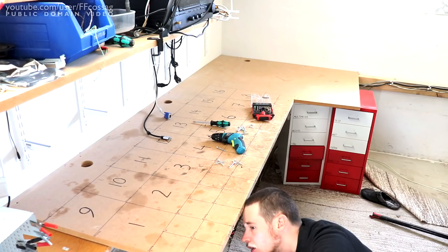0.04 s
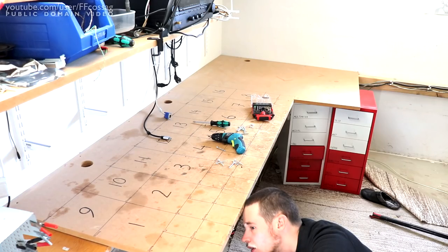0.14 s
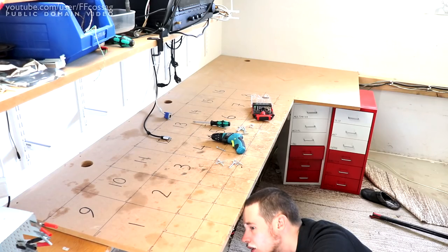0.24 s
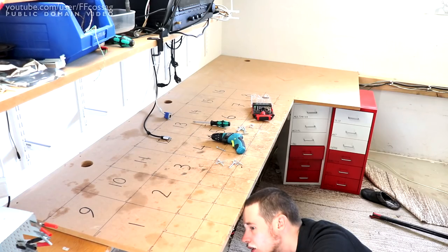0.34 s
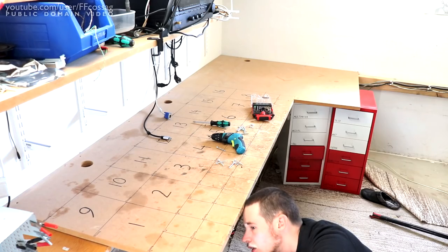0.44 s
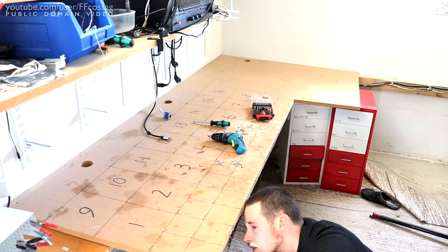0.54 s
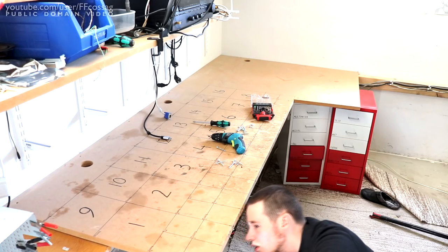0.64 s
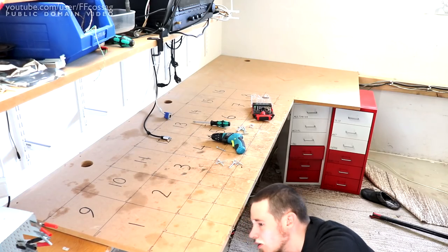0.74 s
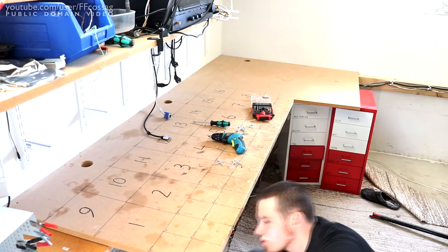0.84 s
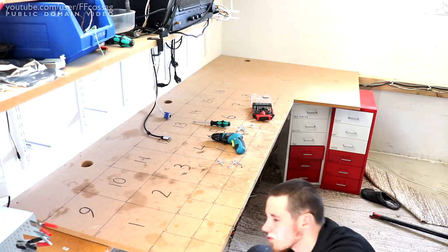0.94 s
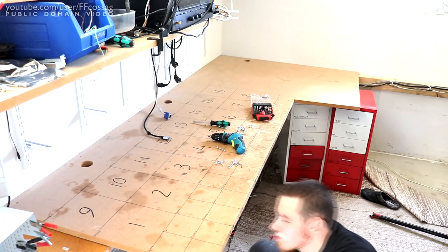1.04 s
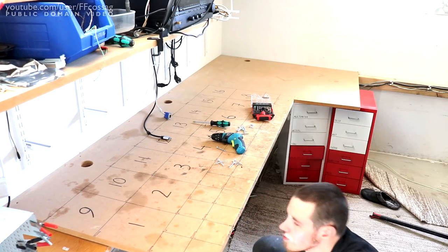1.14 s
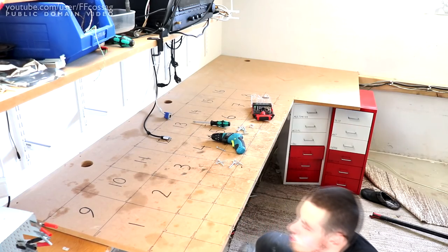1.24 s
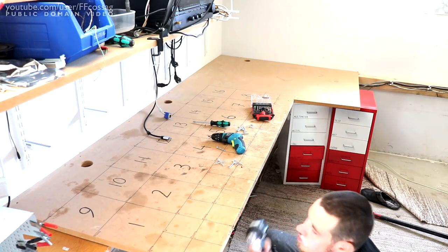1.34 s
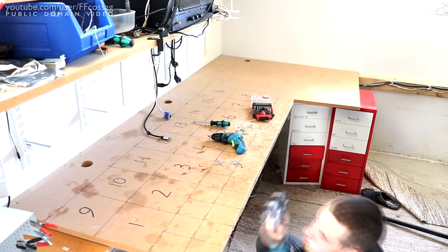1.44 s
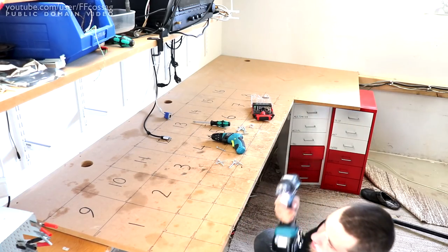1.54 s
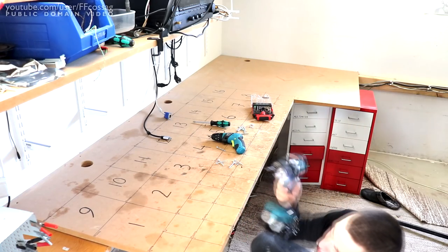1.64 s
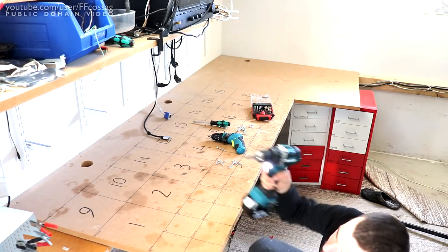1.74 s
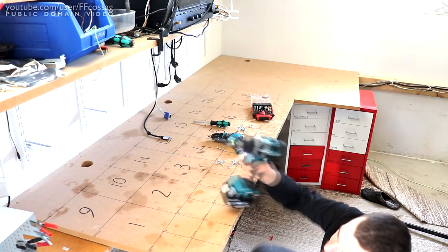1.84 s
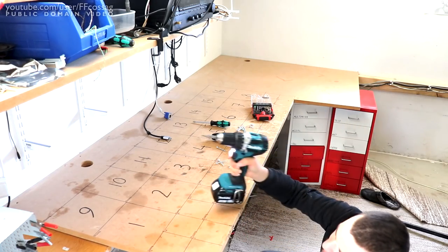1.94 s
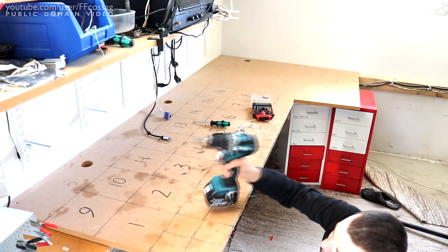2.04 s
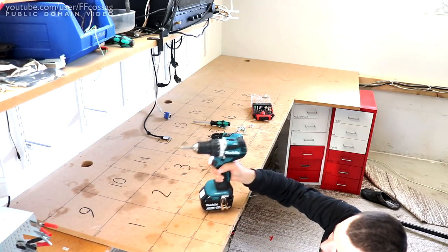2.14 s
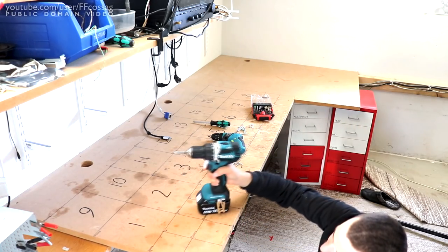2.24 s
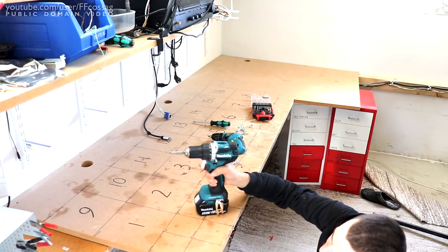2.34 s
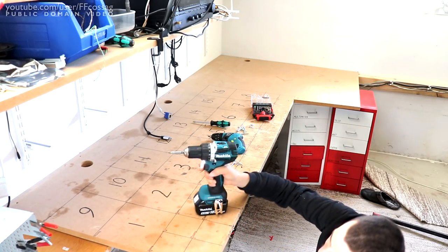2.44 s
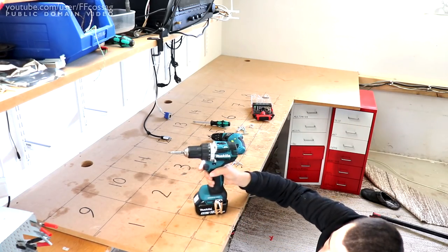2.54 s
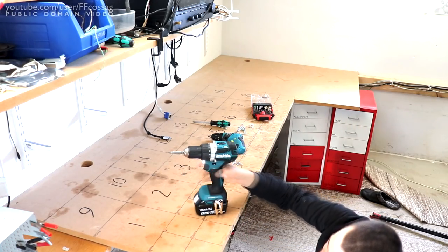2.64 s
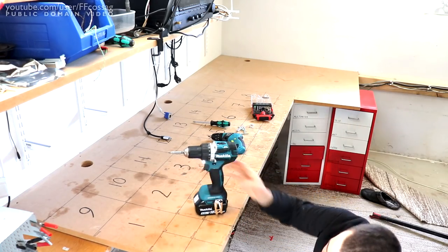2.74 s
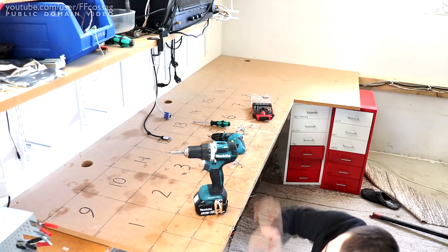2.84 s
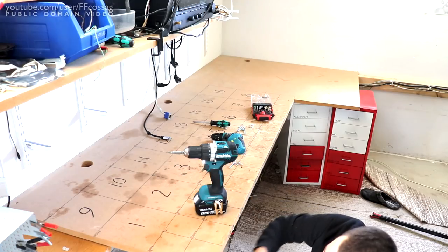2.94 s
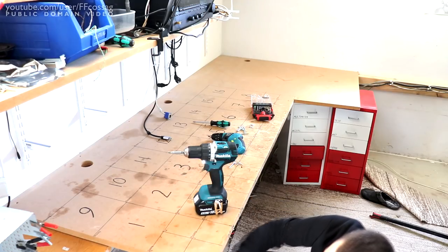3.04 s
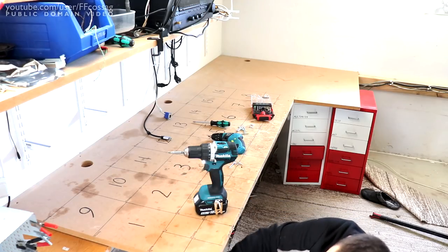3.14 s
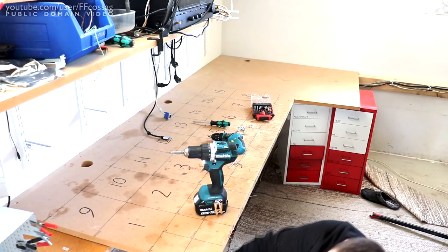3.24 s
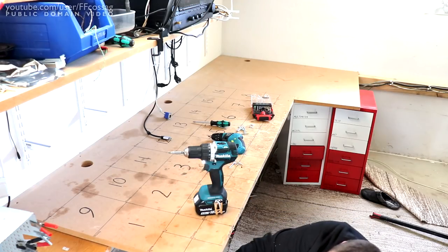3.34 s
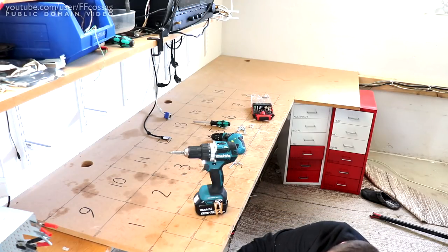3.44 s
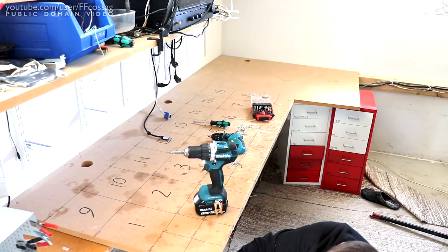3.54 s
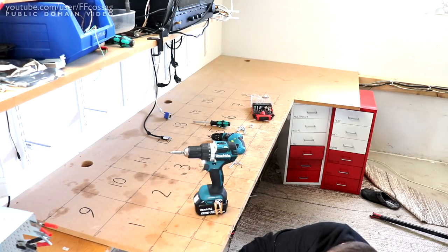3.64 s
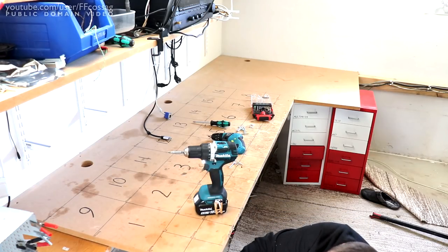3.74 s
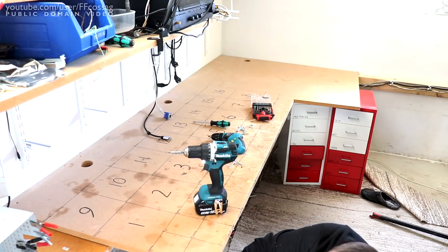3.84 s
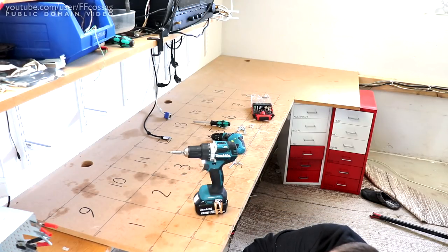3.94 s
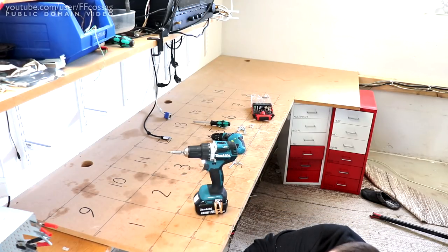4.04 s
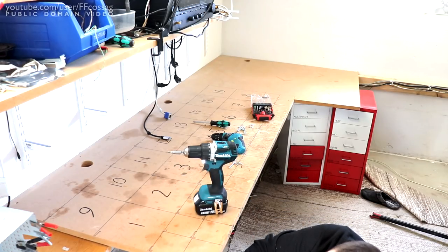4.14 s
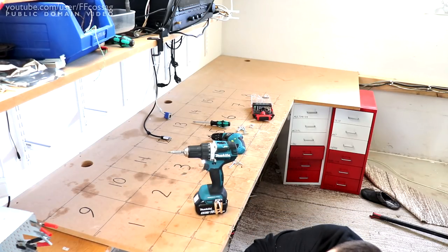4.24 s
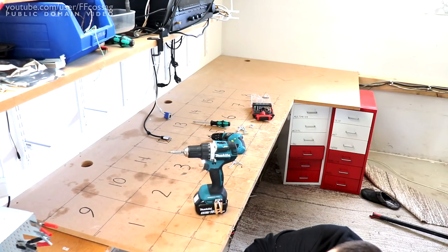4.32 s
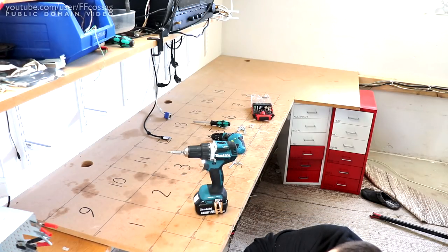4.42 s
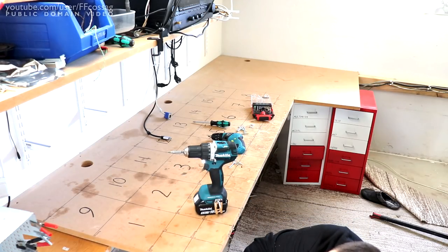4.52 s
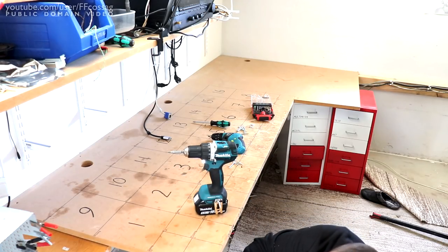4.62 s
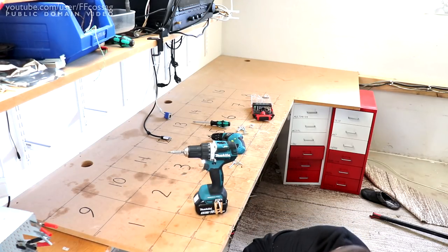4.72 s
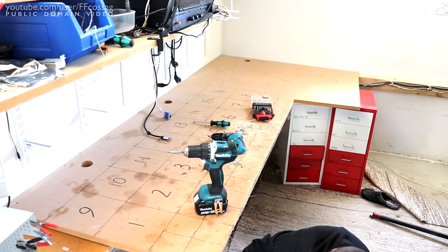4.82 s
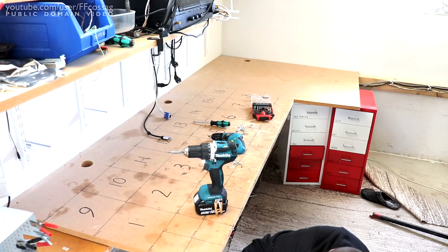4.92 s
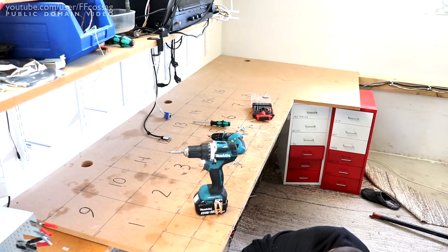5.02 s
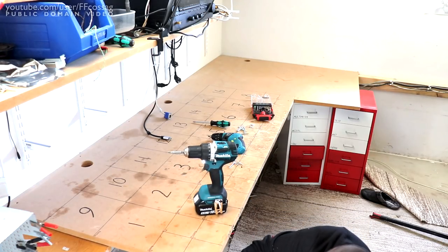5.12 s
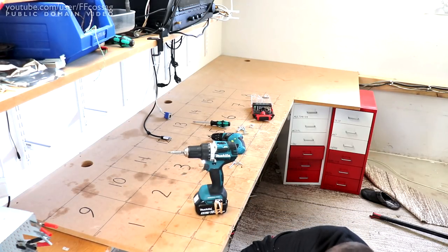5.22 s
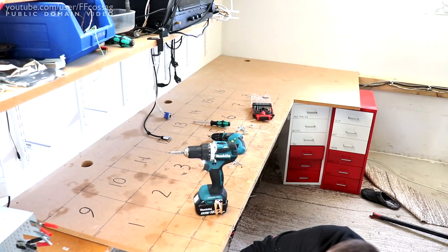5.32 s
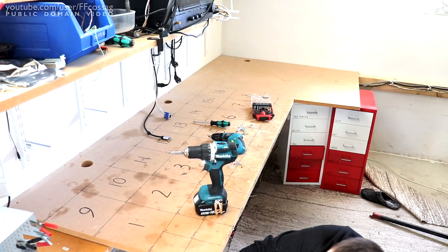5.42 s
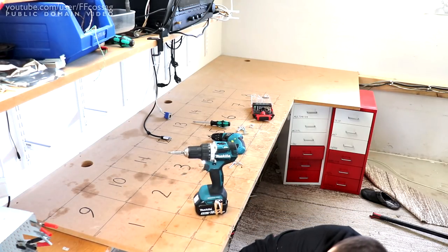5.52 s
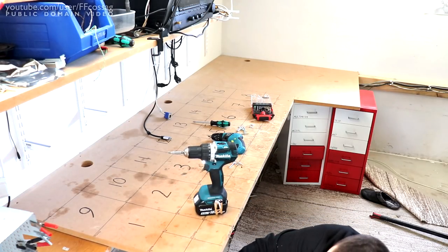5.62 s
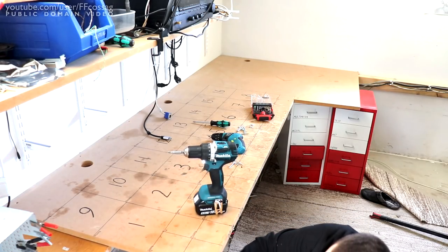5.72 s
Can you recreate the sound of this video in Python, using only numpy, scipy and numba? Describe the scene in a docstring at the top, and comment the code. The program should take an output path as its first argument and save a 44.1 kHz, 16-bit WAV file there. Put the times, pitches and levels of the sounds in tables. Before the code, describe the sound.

A close, fairly dry take in a small workshop with faint room air. At once a cordless drill is running down: grainy gear noise and a thin whine sink in pitch, over soft low bumps, until the gears lock with a sharp double clack at 0.3 s. After a faint metallic stir, a short downward scrape and rough knocks at 0.85-1.0 s, then lighter taps to 1.25 s, as the drill is lifted off the floor. A soft sleeve swish rises around 1.6 s. At 2.33 s comes the loudest event: a hard, cracking thunk on the wooden bench, with quick follow-up clunks to 2.5 s and a low woody ring. From 2.7 s a hand rummages quietly among bits and screws, with tiny clinks near 2.9 s and dull bumps, the strongest at 3.75 s. A faint low hum swells after 4.4 s; the brightest clinks come around 5.45 s.

```python
"""A cordless drill runs down and locks, is dragged and lifted off the floor and set down hard on a wooden bench.
Then a hand rummages among metal bits and screws while soft bumps shake the bench and a low hum swells.
Gear noise and metal pieces are random impacts filtered by resonances; the bench is a sum of decaying modes,
rubbing is moving bands of friction grains, and sparse reflections and filtered noise give the room and its air."""
import sys
import numpy as np
from scipy import signal
from scipy.fft import rfft, irfft
from scipy.io import wavfile
from scipy.ndimage import uniform_filter1d
from numba import njit

SR = 44100
rng = np.random.default_rng(int(sys.argv[2]) if len(sys.argv) > 2 else 0)


def pcm_store(signal):
    """Save signal as 16-bit PCM."""
    levels = np.round(np.clip(np.atleast_2d(signal), -1, 1) * 32767)
    wavfile.write(sys.argv[1], SR, levels.astype(np.int16).T)


N = 254587

# Spectrum of the still room. Each row: frequency in Hz, relative density in dB per Hz.
AIR_SPECTRUM = [(15, -58), (25, -16), (76, -2), (113, -9.5), (200, -5.5), (291, -11), (342, -8.5),
                (637, -13), (691, -12.5), (749, -12.5), (1930, -17), (5230, -21.5), (15800, -29.5)]
# Reverberation of the room. Each row: frequency in Hz, time to fall 60 dB in s.
ROOM_DECAY = [(200, 0.53), (530, 0.33), (1390, 0.23), (3680, 0.3), (9700, 0.27), (15000, 0.23)]
# Swells of the low hum. Each row: time at full level in s, level in dB, rise in s.
HUM_SWELLS = [(4.45, -62, 0.32), (4.65, -61, 0.17), (5.24, -56.5, 0.49)]
# Bench-top modes. Each row: frequency in Hz, level in dB, 60 dB decay time in s for a brief contact,
# build-up time in s before the contact's share, signed weight.
BENCH_MODES = [(83.1, -0.5, 0.77, 0.02, 0.65), (103.1, -2.5, 0.62, 0.061, -0.54),
               (133.9, -1.5, 0.8, 0.0074, 0.32), (162.55, 1, 0.56, 0.042, -0.66),
               (182.6, -6.5, 0.45, 0.023, 0.97), (200.5, -4.5, 0.53, 0.038, 0.73),
               (235, -25, 0.73, 0.016, 0.53), (266.6, -6.5, 0.45, 0.015, 0.74),
               (343, -9, 0.53, 0.023, -1.27), (406, -8, 0.56, 0.011, -0.86), (453, -7, 0.22, .01, 0.68),
               (512, -11.5, 0.22, 0.007, -1.4), (640, -18, 0.25, 0.011, 0.71),
               (900, -7, 0.13, 0.0042, -0.87)]
# The frame's two lowest modes start opposed and beat. Each row: frequency in Hz, 60 dB decay time in s, weight.
FRAME_MODES = [(61.1, 1.2, 1), (65.15, 1.25, -.68)]
# Blows that shake the bench. Each row: start in s, top level in dB, contact time in s, frame sway level in dB.
BUMPS = [(.0, -34.5, 0.0045, -34.5), (0.117, -35.5, 0.0083, -41), (.238, -43.5, 0.0033, -42),
         (.69, -38, 0.0039, -44), (.998, -50, 0.002, -75), (2.332, -15, 0.00055, -15.5),
         (2.405, -28, 0.0028, -30), (3.311, -41, 0.0039, -49.5), (3.758, -25.5, 0.0062, -37.5),
         (4.119, -43.5, .0047, -50), (4.359, -44.5, 0.0079, -60), (4.549, -53.5, 0.0018, -78),
         (5.021, -48, .0056, -64), (5.202, -38, 0.0022, -56), (5.44, -39, 0.0097, -47.5),
         (5.719, -39.5, 0.0085, -69)]
# A drag over the floor with a faint trail after it, a sleeve sweeping up in two moves. Each row: time at full
# level in s, level in dB, rise in s, hold in s, first centre in Hz, last centre in Hz, glide in s.
RUBS = [(0.859, -41, 0.031, 0.15, 1650, 490, .11), (1.201, -64.5, .15, 0.1, 850, 860, .1),
        (1.549, -53, .15, 0.037, 900, 1150, .15), (1.645, -47, .2, 0.018, 1000, 3130, 0.3)]
# Rings of the heavy pieces. Each row: frequency in Hz, width in Hz before broadening, level in dB.
HEAVY_RINGS = [(1245, 17.5, -1), (1376, 31, -4), (1492, 63, 2), (1707, 117, -6.5), (2001, 38.5, 2.5)]
# Rings of the light pieces. Each row: frequency in Hz, width in Hz before broadening, level in dB.
LIGHT_RINGS = [(2270, 50, 3.5), (2650, 220, 2.5), (3250, 104, -6), (3634, 36, -2.5), (3920, 52, -4),
               (4240, 80, -7), (4420, 150, -6), (4625, 78, -5.5), (5080, 59, -5), (5938, 38, -2.5),
               (6140, 180, -8), (6810, 34, -8.5), (7160, 77, -15), (7670, 50, -11.5), (8150, 230, -14.5),
               (8850, 100, -15), (9000, 44, -13.5), (9900, 49, -11), (9420, 82, -19), (10500, 190, -12.5),
               (11300, 92, -16.5), (12600, 33, -19), (13300, 38, -20), (14600, 61, -25)]
# Spectrum of pieces sliding. Each row: frequency in Hz, relative density in dB per Hz.
SLIDE_SPECTRUM = [(150, 1.5), (250, -5), (354, -0.5), (857, -7), (1350, -2), (2000, -10), (2260, -14),
                  (4380, -15), (15800, -57)]
# Strokes of the hand among the bits. Each row: time at full level in s, heavy pieces in dB,
# light pieces in dB, rise in s, hold in s.
STIRS = [(.57, -61.5, -65, .06, 0.025), (0.692, -57.5, -61, 0.076, 0.027), (2.63, -62, -67, .04, .005),
         (2.707, -78, -56, 0.092, .005), (2.795, -56, -58, 0.088, .005), (2.914, -49.5, -50, 0.059, 0.0042),
         (3.317, -41.5, -43, 0.043, 0.013), (3.411, -58, -52.5, 0.046, .005),
         (3.698, -53, -52.5, 0.034, 0.024), (3.812, -44.5, -48, .16, 0.024),
         (4.103, -47.5, -51.5, 0.085, .04), (4.354, -44.5, -50.5, 0.11, .015),
         (4.57, -46.5, -50.5, 0.082, 0.0054), (4.888, -54.5, -59, .05, 0.055),
         (5.047, -47, -53, 0.093, 0.096), (5.201, -39.5, -44, 0.083, 0.0086),
         (5.28, -61.5, -55.5, .06, 0.063), (5.474, -61.5, -41, 0.22, 0.038), (5.78, -53, -44.5, 0.13, .01)]
# Single clinks of light pieces. Each row: start in s, level in dB, decay constant of the drive in s,
# main ring in Hz, relative level of that ring in dB.
CLINKS = [(2.899, -34, 0.0074, 2226, 27), (2.998, -43, 0.003, 5800, 11), (3.014, -42, 0.0042, 5350, 8),
          (3.673, -41.5, 0.041, 4420, 18), (5.164, -34, 0.017, 4370, 19), (5.253, -34.5, 0.027, 2620, 6),
          (5.419, -32, 0.014, 2270, 7), (5.464, -16.5, 0.0037, 2270, 4), (5.495, -20.5, 0.0057, 2270, 4),
          (5.705, -42.5, 0.026, 11100, 4), (5.74, -41, .008, 2270, -5)]
# Hard contacts. Each row: start in s, level in dB, brightness in dB per octave, rise constant in s,
# chatter decay constant in s, high-pass corner in Hz.
KNOCKS = [(0.314, -14, -0.5, 0.0007, 0.0042, 2200), (0.334, -14.5, 2, .0015, 0.012, 696),
          (0.841, -22, -1.5, 0.0051, .017, 570), (.911, -27, -2.5, 0.0012, 0.011, 340),
          (0.961, -26.5, -4, 0.005, 0.028, 596), (1.139, -39.5, -1.5, 0.0026, 0.013, 300),
          (1.244, -41, -15.5, .0015, 0.0096, 304), (2.3314, -2.5, -2.5, 0.00056, 0.0058, 200),
          (2.343, -6.5, -5.5, 0.0019, 0.014, 250), (2.36, -5, -8, 0.0022, 0.013, 249),
          (2.406, -9, -6.5, 0.006, 0.015, 250), (2.466, -12, -13.5, 0.0037, .02, 198),
          (2.71, -46, 11, .004, 0.015, 505), (3.295, -42, -26, .002, .025, 300),
          (5.2, -50, -15, .01, .019, 200)]
# Spectrum of a hard contact before its brightness. Each row: frequency in Hz, relative density in dB per Hz.
CONTACT_SPECTRUM = [(88, -13), (150, -8.5), (566, -3), (871, -6.5), (1390, -2), (1830, -5), (2020, -4.5),
                    (2700, -6.5), (2920, -8.5), (9260, -19), (16000, -36)]
# Gear rate running down. Each row: time in s, rate in Hz.
GEAR_RATE = [(0, 665), (.07, 640), (.18, 563), (.26, 532), (.3, 500), (.345, 441)]
# Meshing noise. Each row: frequency in Hz, relative density in dB per Hz.
MESH_SPECTRUM = [(120, -16), (200, -14.5), (340, -6), (366, -9.5), (863, -21.5), (1100, -12.5),
                 (1200, -9.5), (2190, -10), (2400, -9), (4160, -4), (5180, 2), (13900, -32), (15800, -31)]
# Resonances of the drill's shell. Each row: frequency in Hz, width of each of two poles in Hz, level in dB.
SHELL_MODES = [(2150, 98, -2), (2850, 28, -14), (3200, 44, -17), (3430, 260, -4), (4580, 24, -18),
               (5070, 150, 2), (5400, 110, -13), (5900, 63, -9), (5830, 29, 2), (6630, 170, 5),
               (7170, 95, 1), (8700, 73, -3)]
# Tones tied to the gear rate. Each row: multiple of the rate, relative level in dB.
GEAR_TONES = [(.5, 0), (2, -7), (3, -4), (4, -2)]
# Tone of the speed controller: starting frequency in Hz, starting level in dB.
CONTROLLER_TONE = (15420, -57)

# Source levels are in dB before the mix in scene().
AIR_DB = -60.5
HUM_HZ, HUM_HOLD_S, HUM_FALL_DB_PER_S = 185.5, 0.012, 113
RISE_DB = 25  # growth of any stroke during its rise
DEEP_DB, PLAIN_CONTACT_S = 2, .0018  # the lowest top mode gains this much each time the contact doubles
RUB_FALL_DB_PER_S = 254
STIR_FALL_DB_PER_S, LIGHT_LEAD_S = 291, 0.011  # the light pieces move first
GEAR_DB, GEAR_SAG_DB_PER_S = -26, 14
LOCK_S, LOCK_DB_PER_S = .33, 2000  # the gears stop
WHINE_DB, WHINE_SWELL_DB_PER_S, WHINE_FULL_S = -41.5, 64, 0.15  # the tones come up as the speed falls
GROWL_DB, GROWL_FADE_DB_PER_S = -41.5, 65  # the half-rate tone instead dies away from the start
BAND_LIMIT_HZ = 15750


def amp(db):
    """Level definition: the amplitude gain of a level in dB."""
    return 10 ** (np.asarray(db) / 20)


def even(x):
    """Power normalization: scales to rms 1."""
    return x / np.sqrt(np.mean(x ** 2) + 1e-20)


def steady(x, span_s):
    """Short-time power normalization: evens the slow level of a random sound."""
    power = abs(uniform_filter1d(x ** 2, round(span_s * SR)))
    return x / np.sqrt(power + 1e-20)


def read(points, hz):
    """Interpolation of a table on a logarithmic frequency axis."""
    f, value = np.transpose(points)
    return np.interp(np.log(hz + 1), np.log(f + 1), value)


def add(mix, s, sound):
    """Superposition: adds a sound to the mix at time s."""
    part = mix[round(s * SR):][:len(sound)]
    part += sound[:len(part)]


def colour(x, points, tilt_db=0.):
    """Spectral shaping by a table, tilted in dB per octave about roughly 1 kHz."""
    hz = np.fft.rfftfreq(len(x), 1 / SR)
    tilt = tilt_db * np.log2((hz + 100) / 1000)
    return irfft(rfft(x) * amp(read(points, hz) + tilt), len(x))


@njit
def smooth(x, r):
    """First-order low-pass filtering with a pole that may change."""
    out, y = np.empty_like(x), 0j
    for i in range(len(x)):
        y = r[i] * y + (1 - r[i]) * x[i]
        out[i] = y
    return out


def resonate(x, hz, width):
    """Heterodyne resonance: shifts a moving centre to zero, smooths, and shifts it back."""
    turn = np.exp(2j * np.pi * np.cumsum(hz) / SR)
    r = np.exp(-np.pi * width / SR)
    return 2 * (turn * smooth(x / turn, r)).real


def twice(x, hz, width):
    """Second-order resonance: one fixed complex pole applied two times for steep skirts."""
    r = np.exp(-np.pi * width / SR)
    pole = r * np.exp(2j * np.pi * hz / SR)
    return 2 * signal.lfilter([(1 - r) ** 2], [1, -2 * pole, pole ** 2], x + 0j).real


def taps(count, per_s, spread_db):
    """Impulsive excitation: a random train of small impacts, a few much larger."""
    u, size = rng.random(count), rng.exponential(1, count)
    sign = rng.choice([-1., 1.], count)
    return sign * amp(spread_db * np.minimum(size, 4)) * (u < per_s / SR)


def swell(t, s, rise, hold, fall_db):
    """Exponential envelope in dB: rise, hold from time s, then a steady fall per second."""
    growth = -RISE_DB * np.maximum(s - t, 0) / rise
    return growth - fall_db * np.maximum(t - s - hold, 0)


def still_air():
    """Stationary noise: Gaussian noise shaped to the spectrum of the still room."""
    return amp(AIR_DB) * even(colour(rng.standard_normal(N), AIR_SPECTRUM))


def hum():
    """Narrow-band noise: a resonance makes a low tone that comes and goes."""
    t = np.arange(N) / SR
    level = sum(amp(db + swell(t, s, rise, HUM_HOLD_S, HUM_FALL_DB_PER_S)) for s, db, rise in HUM_SWELLS)
    return level * steady(twice(rng.standard_normal(N), HUM_HZ, 11.0), 0.088)


def room(x):
    """Reverberation: sparse reflections of random sign, each band dying at its own speed."""
    tail = np.zeros(SR)
    at = np.arange(200, SR - 20, 20)
    tail[at + rng.integers(0, 20, len(at))] = rng.choice([-1., 1.], len(at))
    hz, t, bands = signal.stft(tail, SR, nperseg=256)
    decay = amp(-60 * t / read(ROOM_DECAY, hz)[:, None])
    tail = signal.istft(bands * decay, SR, nperseg=256)[1]
    return signal.fftconvolve(x, tail / np.linalg.norm(tail))[:N]


def bump(db, contact, sway_db):
    """Modal excitation: a longer contact excites only the low modes, and each spot favours others."""
    t, top = np.arange(SR + SR // 2) / SR, 0
    spot_db = 0.57 * rng.standard_normal(len(BENCH_MODES))
    spot_db[0] = DEEP_DB * np.log2(contact / PLAIN_CONTACT_S)
    for k, (hz, mode_db, t60, rise, sign) in enumerate(BENCH_MODES):
        soft = 1 / (1 + (hz * contact) ** 4)
        grow = 1 - np.exp(-t / (rise + 0.88 * contact))  # a soft push builds up slowly
        damped = t60 / (1 + 0.25 * hz * contact * (k > 0))  # the body that pushes also muffles the top
        level_db = mode_db + spot_db[k] - 60 * t / damped
        top = top + sign * soft * amp(level_db) * grow * np.sin(2 * np.pi * hz * t)
    sway = sum(w * amp(-60 * t / t60) * np.sin(2 * np.pi * hz * t) for hz, t60, w in FRAME_MODES)
    late = (1 - np.exp(-t / 0.073)) ** 2  # the heavy frame starts late
    return amp(db) * top + amp(sway_db) * sway * late


def rub(s, level_db, rise, hold, first_hz, last_hz, glide):
    """Friction: fine random grains fill a broad band that moves with the stroke."""
    t = np.arange(s - rise, s + hold + .15, 1 / SR)
    db = level_db + swell(t, s, rise, hold, RUB_FALL_DB_PER_S)
    hz = first_hz * (last_hz / first_hz) ** np.minimum((t - t[0]) / glide, 1)
    grain = taps(len(t), 9000, 3.6)
    body = resonate(resonate(grain, hz, 1.24 * hz), hz, 1.33 * hz)
    edge = resonate(resonate(grain, 2 * hz, 2 * hz), 2 * hz, 2 * hz)
    return t[0], amp(db) * steady(even(body) + 0.3 * even(edge), 0.024)


def ring(drive, modes, fits_db):
    """Modal resonance of metal pieces, each struck in its own fits and starts."""
    out = 0
    for hz, width, db in modes:
        fits = even(uniform_filter1d(rng.standard_normal(len(drive)), 1500))
        out = out + amp(db + fits_db * fits) * twice(drive, hz, 2.46 * width)
    return out


def rummage():
    """Random collisions: bits and screws jostle, heavy and light rings over a sliding hiss."""
    t = np.arange(STIRS[0][0] - .1, N / SR, 1 / SR)
    n = len(t)
    big, small = np.zeros(n), np.zeros(n)
    for s, heavy_db, light_db, rise, hold in STIRS:
        big += amp(heavy_db + swell(t, s, rise, hold, STIR_FALL_DB_PER_S))
        small += amp(light_db + swell(t + LIGHT_LEAD_S, s, rise, hold, STIR_FALL_DB_PER_S))
    heavy = steady(ring(taps(n, 2500, 3.), HEAVY_RINGS, 3.), .05)
    light = steady(ring(taps(n, 2500, 1.8), LIGHT_RINGS, 5.3), 0.054)
    slide = even(colour(taps(n, 8000, 1.05), SLIDE_SPECTRUM))
    return t[0], big * heavy + small * light + amp(-2.5) * np.sqrt(big * small) * slide


def clink(db, length, hz, extra_db):
    """Impact resonance: one light piece dropped among the others; its own ring is set apart."""
    t = np.arange(4096) / SR
    drive = rng.standard_normal(len(t)) * np.exp(-t / length) * np.minimum(t / 0.00061, 1)
    sound = even(ring(drive, LIGHT_RINGS, 3.9))
    sound += amp(extra_db - 10) * even(twice(drive, hz, 180.0))
    sound += .5 * even(twice(drive, 7800.0, 8000.0))  # broad treble
    onset_rms = np.sqrt(np.mean(sound[:400] ** 2))
    return amp(db - 11) * sound / onset_rms


def knock(db, tilt_db, rise, length, low_hz):
    """Hard contact: a short chatter dies away; small parts radiate no bass."""
    t = np.arange(6000) / SR
    burst = colour(rng.standard_normal(len(t)), CONTACT_SPECTRUM, tilt_db)
    high_pass = signal.butter(2, low_hz, "high", fs=SR, output="sos")
    burst = even(signal.sosfilt(high_pass, burst))
    return amp(db - 7) * burst * np.exp(-t / length) * (1 - np.exp(-t / rise))


def drill():
    """Gear meshing: impacts ring the shell and tones follow the falling speed until the gears lock."""
    t = np.arange(0, GEAR_RATE[-1][0], 1 / SR)
    hz = np.interp(t, *np.transpose(GEAR_RATE))
    lock_db = LOCK_DB_PER_S * np.maximum(t - LOCK_S, 0)
    noise_db = GEAR_DB - GEAR_SAG_DB_PER_S * t - lock_db
    whine_db = WHINE_DB - WHINE_SWELL_DB_PER_S * np.maximum(WHINE_FULL_S - t, 0) - lock_db
    growl_db = GROWL_DB - GROWL_FADE_DB_PER_S * t - lock_db

    mesh = taps(len(t), 6000, 3.6)
    shell = sum(amp(db) * twice(mesh, f, width) for f, width, db in SHELL_MODES)
    noise = even(colour(mesh, MESH_SPECTRUM)) + 0.26 * even(shell)

    turns = np.cumsum(hz) / SR
    # teeth load unevenly
    waver = even(uniform_filter1d(rng.standard_normal((len(GEAR_TONES), len(t))), 600))
    tones = 0
    for (multiple, db), w in zip(GEAR_TONES, waver):
        tone_db = db + 2 * w + (whine_db if multiple > 1 else growl_db)
        tones = tones + amp(tone_db) * np.sin(2 * np.pi * multiple * turns)

    start_hz, switch_db = CONTROLLER_TONE
    switch_hz = start_hz + .7 * (hz[0] - hz)  # rises as the gears slow
    switch = amp(switch_db) * np.sin(2 * np.pi * np.cumsum(switch_hz) / SR)
    return amp(noise_db) * even(noise) + tones + amp(noise_db - noise_db[0]) * switch


def scene():
    """Superposition of direct sound, reflections, the bench with the hum, and the still air."""
    near, wood = np.zeros(N), hum()
    for s, *row in BUMPS:
        add(wood, s, bump(*row))
    for row in RUBS:
        add(near, *rub(*row))
    add(near, *rummage())
    for s, *row in CLINKS:
        add(near, s, clink(*row))
    for s, *row in KNOCKS:
        add(near, s, knock(*row))
    add(near, 0, drill())
    return (amp(-3.0) * near + amp(-8.5) * room(near) + wood + still_air())[None]


def record(dry):
    """Saturation rounds off the loudest peaks; a linear-phase low-pass then limits the band."""
    rounded = .7 * np.tanh(dry / .7)
    low_pass = signal.firwin(511, BAND_LIMIT_HZ, window=("kaiser", 9), fs=SR)
    return signal.oaconvolve(rounded, low_pass[None], "same")


dry = scene()
out = record(dry)
pcm_store(out)
```